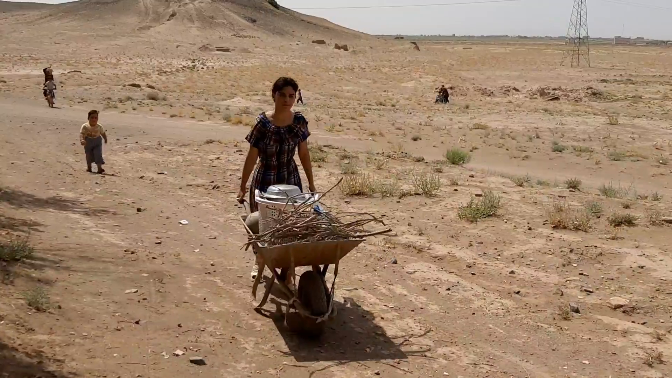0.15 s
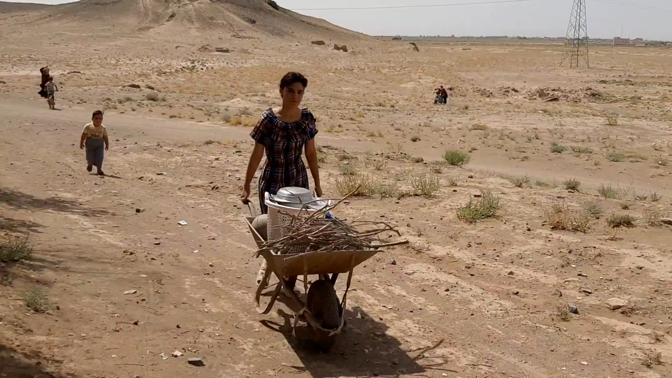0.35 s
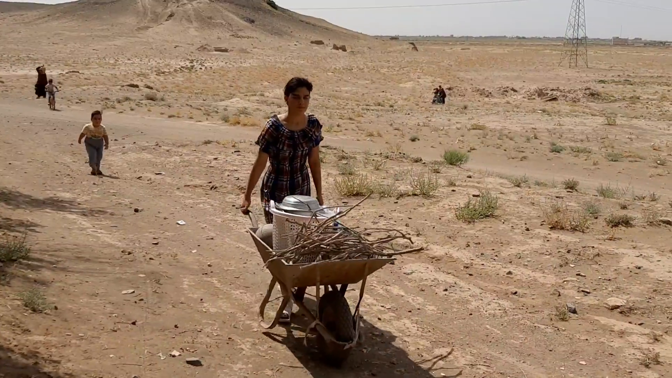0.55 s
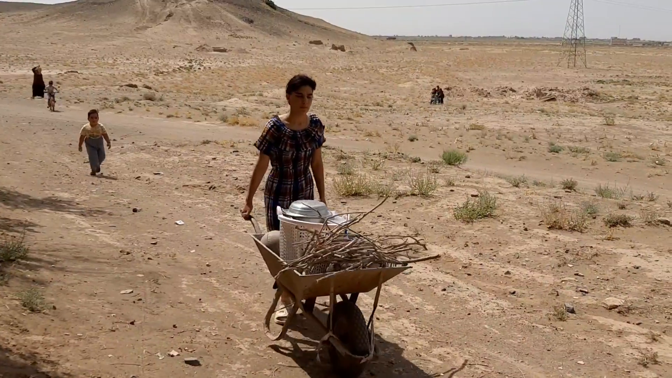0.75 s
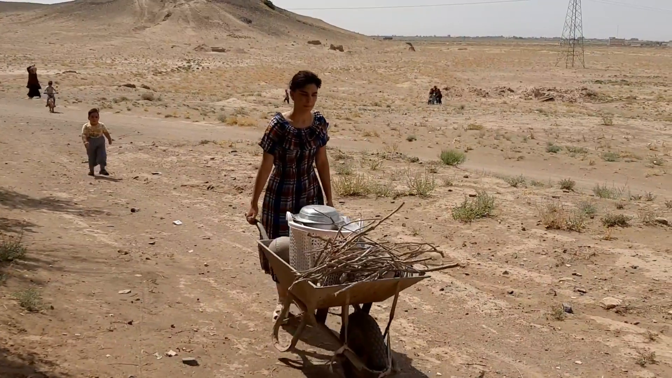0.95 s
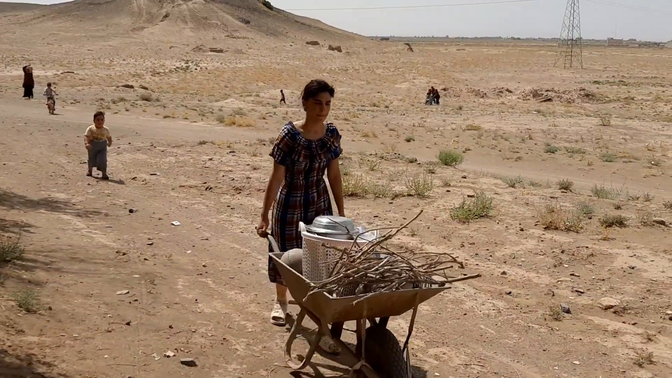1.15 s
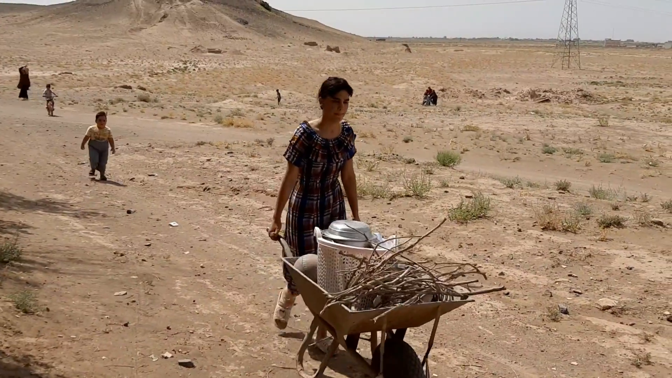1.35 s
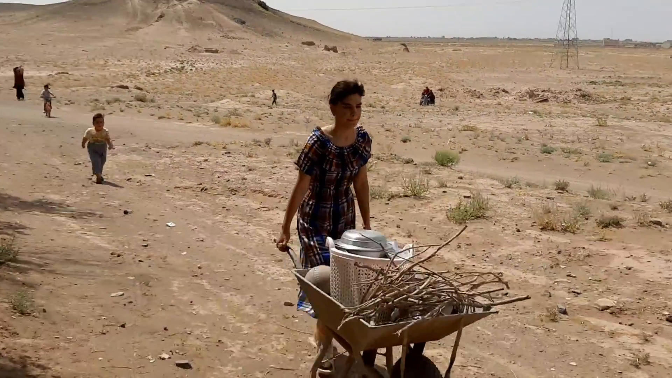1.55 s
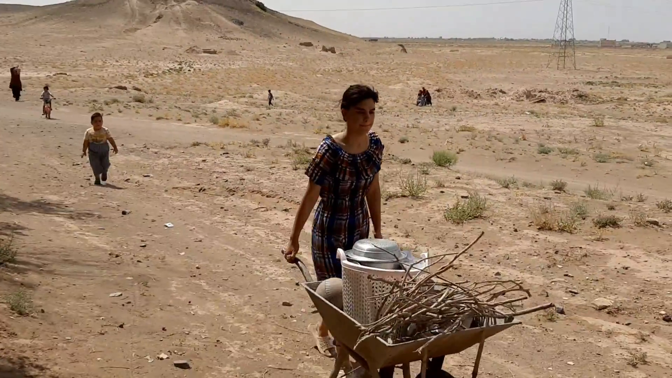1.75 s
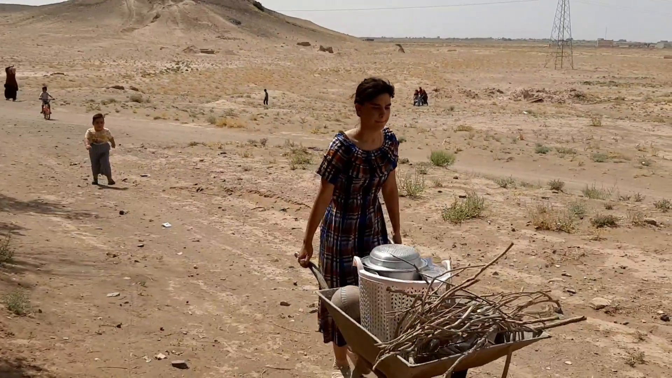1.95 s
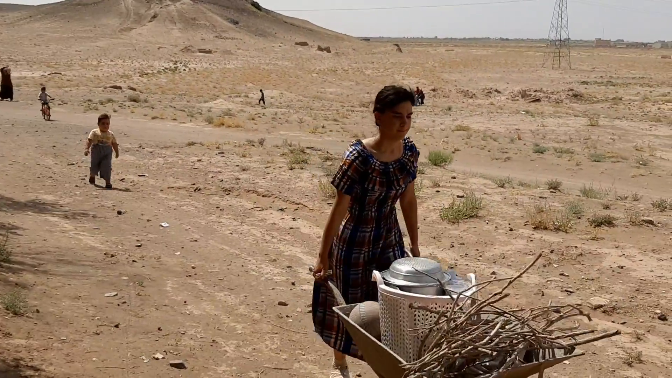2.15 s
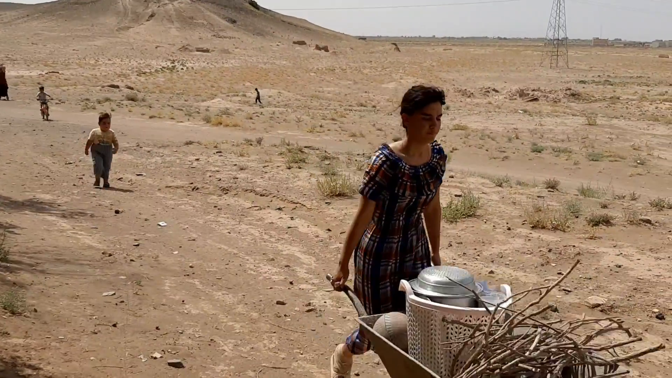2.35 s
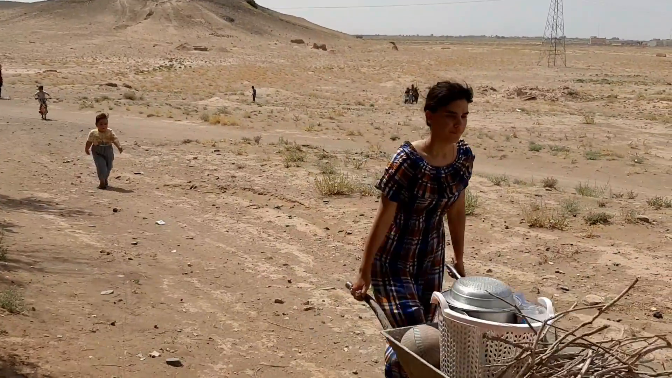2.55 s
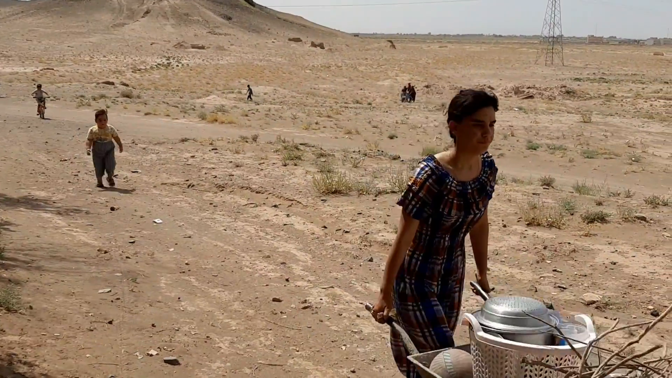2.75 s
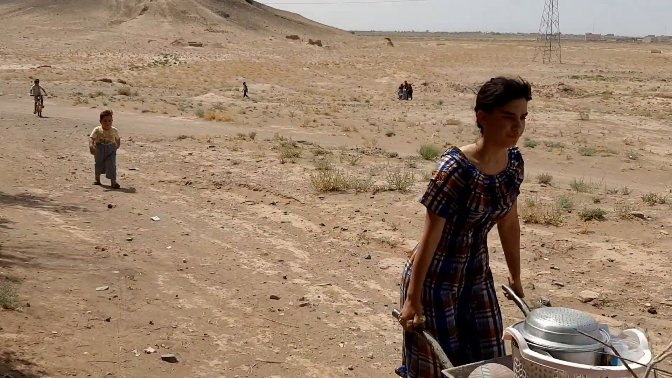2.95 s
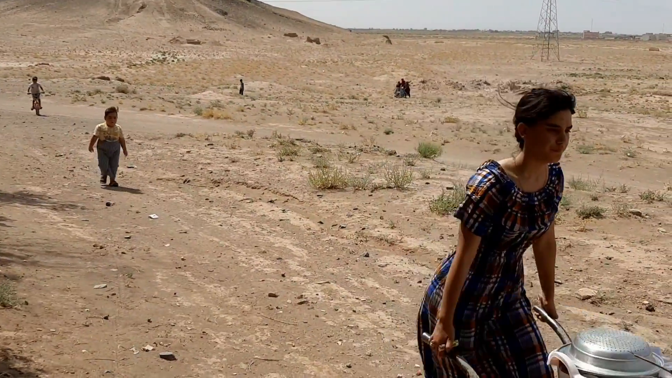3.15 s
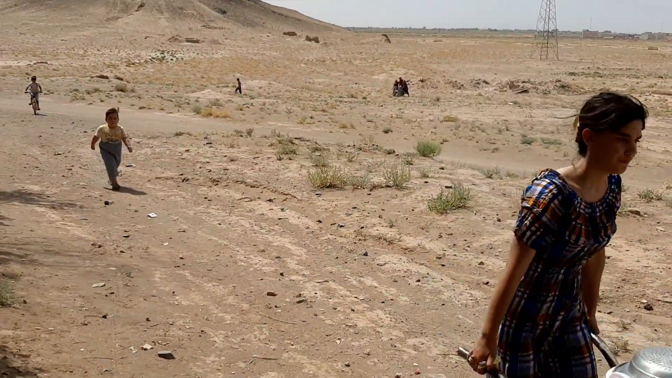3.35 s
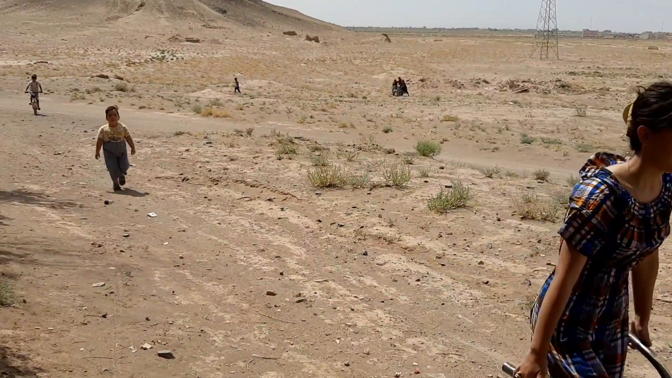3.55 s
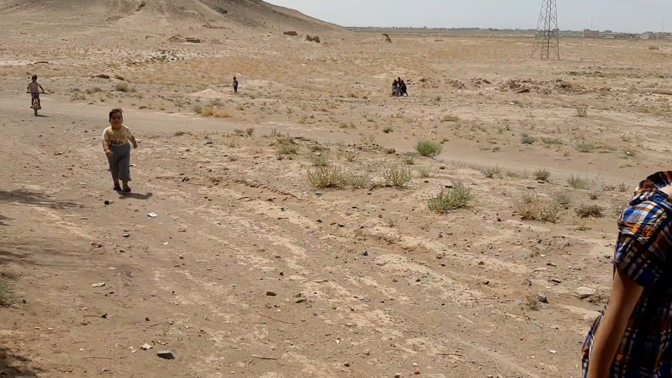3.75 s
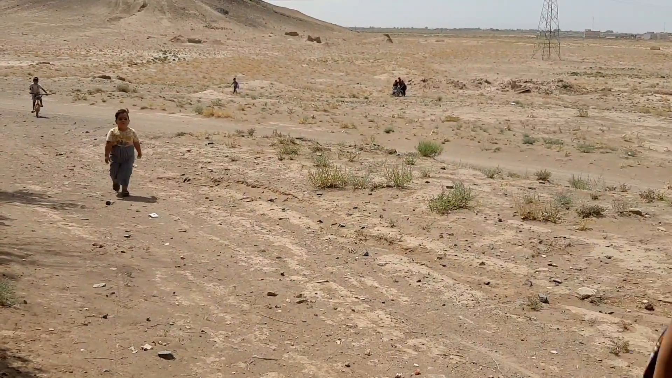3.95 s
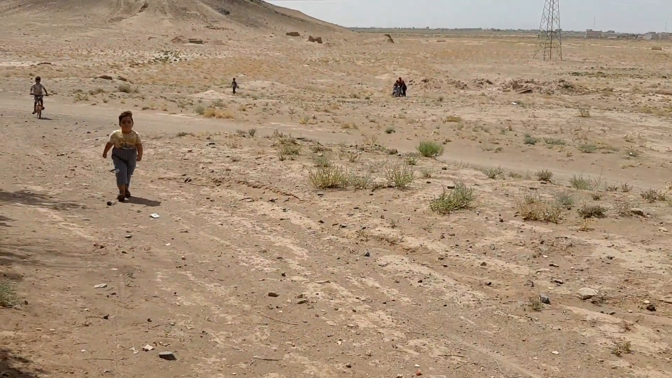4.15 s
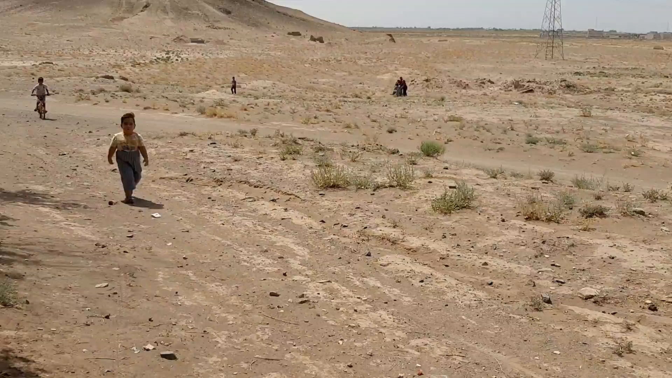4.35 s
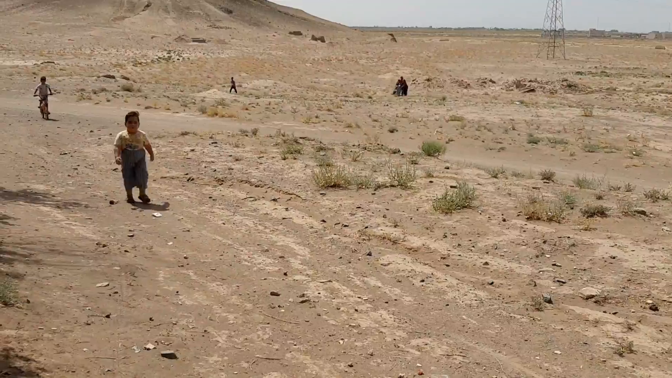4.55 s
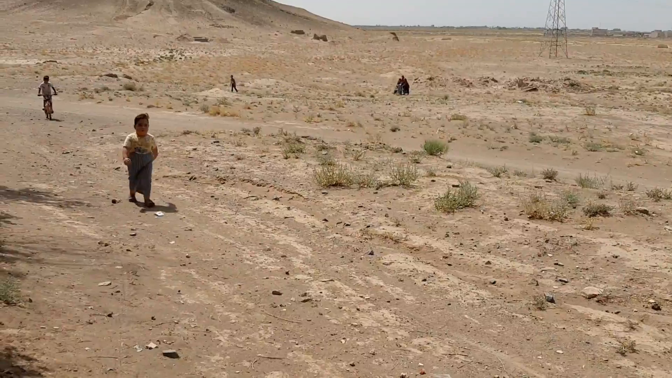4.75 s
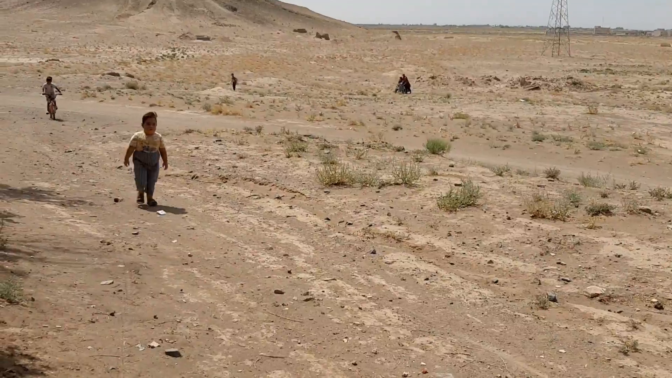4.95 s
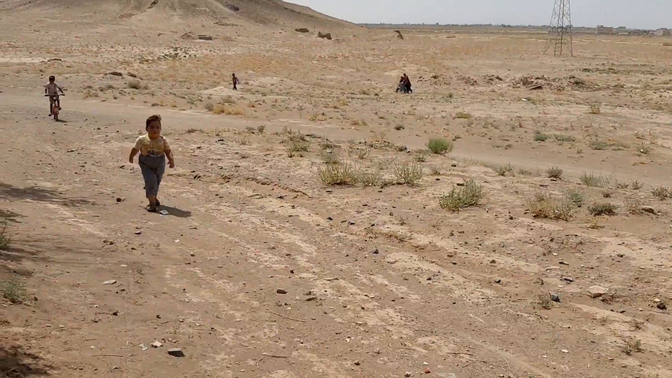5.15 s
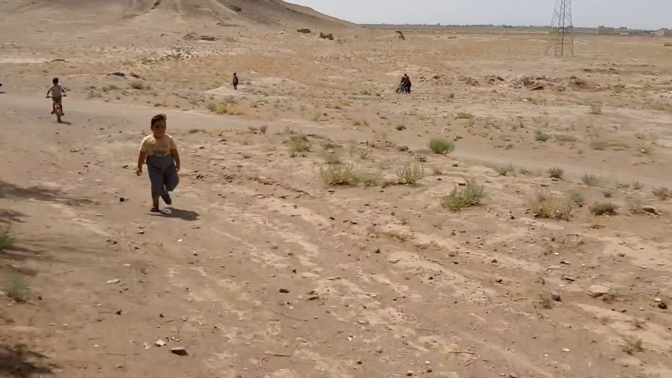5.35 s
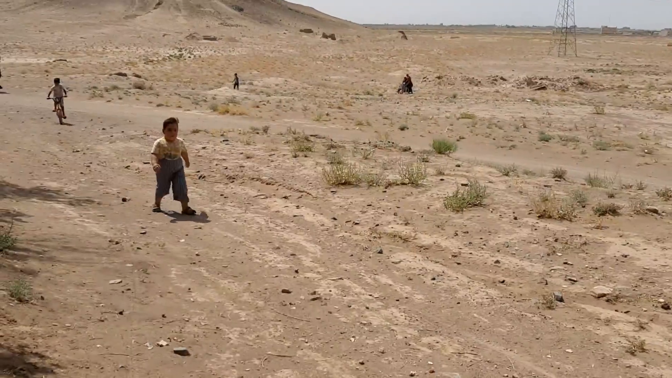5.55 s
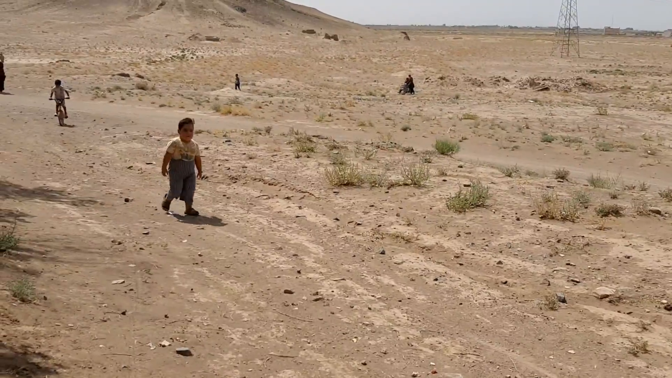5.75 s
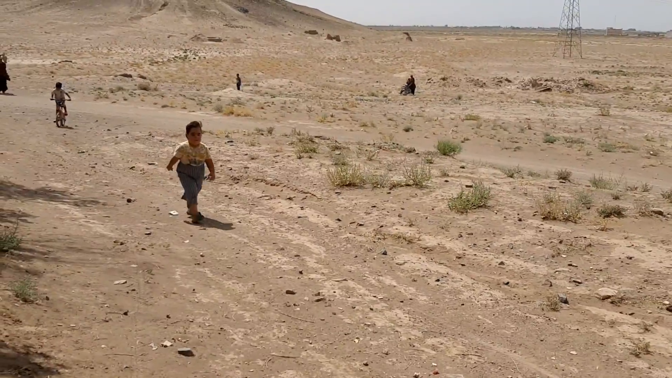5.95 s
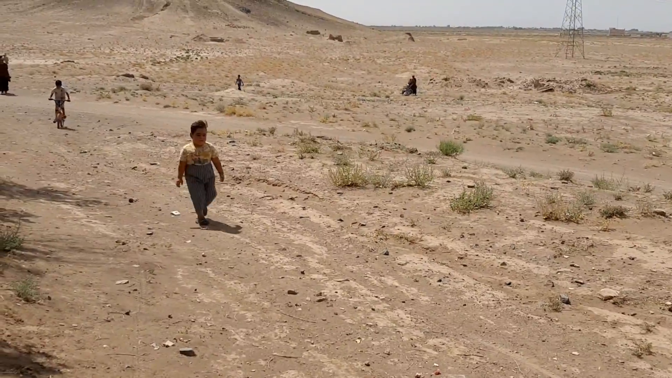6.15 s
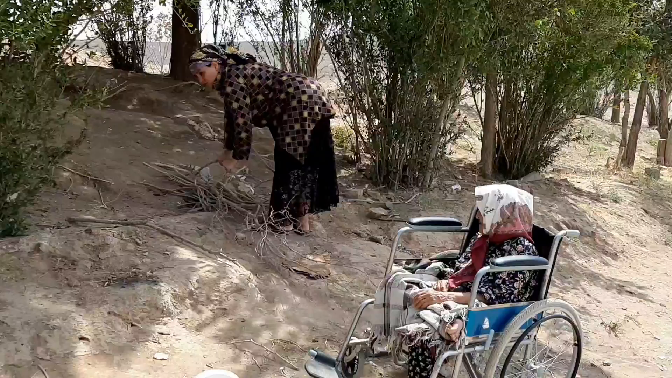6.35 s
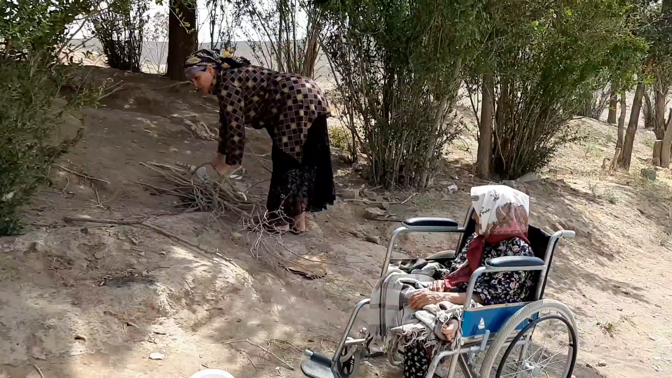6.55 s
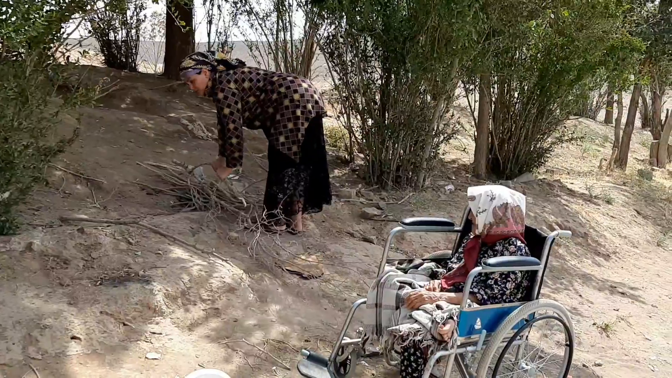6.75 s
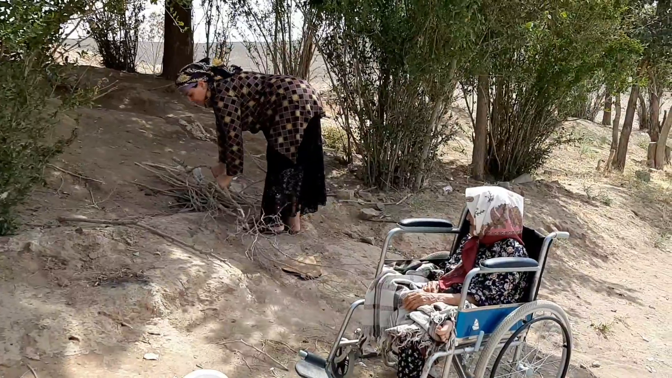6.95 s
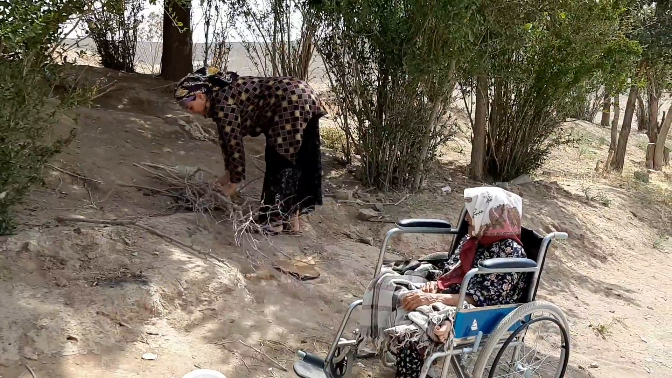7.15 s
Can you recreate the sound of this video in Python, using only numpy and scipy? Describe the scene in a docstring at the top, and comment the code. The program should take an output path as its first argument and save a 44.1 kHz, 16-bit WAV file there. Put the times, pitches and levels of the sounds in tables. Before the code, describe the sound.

Faint gritty crunching grows into metallic clatter and hollow tray booms, peaks in a hard jolt, then cuts to gusty wind and a dry wood crack.

```python
"""A steel wheelbarrow of pots and sticks is pushed over dry stony ground, close by on the microphone's right.
Blows make its load chatter, boom in the tray and ring the steel; on hard ground the tyre's lugs strike
about twelve times a second. Filtered grains make grit, scuffs and drone; decaying sines make pots clink.
Noise in gusts buffets the two microphone ports. Then the scene changes to a windy grove:
dry twigs snapped for firewood crack as splintering grains and rustle, and a branch rings."""
import sys
import numpy as np
from scipy import signal
from scipy.fft import rfft, irfft, next_fast_len
from scipy.io import wavfile
from scipy.ndimage import map_coordinates

SR = 44100
rng = np.random.default_rng(int(sys.argv[2]) if len(sys.argv) > 2 else 0)


def unload_wav(signal):
    """Save mono or channel-first audio to the path in sys.argv[1] as 16-bit WAV at rate SR, clipped to [-1, 1]."""
    wavfile.write(
        sys.argv[1],
        SR,
        np.round(np.clip(np.atleast_2d(signal).T, -1, 1) * 32767).astype(np.int16),
    )


N = 317564

CHANGE_S = 6.371  # the plain gives way to the grove
TOP_HZ = 15900  # upper band limit of the microphone


def amp(db):
    """Amplitude factor of a level in dB."""
    return 10 ** (np.asarray(db) / 20)


def unit(x):
    """x scaled to rms 1."""
    return x / np.sqrt(np.mean(x ** 2) + 1e-20)


def colour(points):
    """Gain against frequency from (f/Hz, level/dB) points on a log axis."""
    f, db = np.transpose(points)
    return lambda hz: amp(np.interp(np.log(hz + 1), np.log(f), db))


def resonances(modes):
    """Causal response of a few (f/Hz, width/Hz, level/dB) resonances."""
    return lambda f: sum(amp(db) * 1j * f * w / (c * c - f * f + 1j * f * w) for c, w, db in modes)


def curves(rows):
    """One value per sample for each column after the time."""
    s, *columns = np.transpose(rows)
    return [np.interp(np.arange(N) / SR, s, column) for column in columns]


def wobble(rate):
    """A smooth random curve, rate knots a second."""
    knots = rng.standard_normal(int(N * rate / SR) + 4)
    return map_coordinates(knots, [np.arange(N) * rate / SR])


def filtered(x, response):
    """x times a response of frequency."""
    n = x.shape[-1]
    m = next_fast_len(n + 4096)
    return irfft(rfft(x, m) * response(np.fft.rfftfreq(m, 1 / SR)), m)[..., :n]


def causal(points, size=2048):
    """Minimum-phase impulse response with the given spectrum, by folding the cepstrum."""
    cepstrum = irfft(np.log(colour(points)(np.fft.rfftfreq(size, 1 / SR))))
    cepstrum[1:size // 2] *= 2
    cepstrum[size // 2 + 1:] = 0
    return irfft(np.exp(rfft(cepstrum)))


def unequal_sizes(n, spread_db):
    """Random strengths, with a clipped normal spread in dB."""
    return amp(spread_db * np.clip(rng.standard_normal(n), -2, 2))


def grains(n, rate, spread_db, unlike=1.0):
    """Random tiny impacts of unequal size, rms 1; each one radiates differently to the two ports."""
    sizes = unequal_sizes(n, spread_db) * rng.choice([-1, 1], n)
    struck = rng.random(n) < rate / SR
    ports = 1 + unlike * rng.standard_normal((2, n))
    return unit(sizes * struck * ports)


def pebbles(hz, spread_db, count, size):
    """Stereo patter of rms 1: tiny stones that each ring for a few cycles at their own pitch."""
    t = np.arange(size) / SR
    pitch = np.minimum(hz * np.exp(.28 * rng.standard_normal((count, 1))), TOP_HZ)
    ticks = np.sin(2 * np.pi * pitch * t) * np.exp(-pitch * t / 2.5)
    ports = 1 + rng.standard_normal((2, count))
    sizes = unequal_sizes(count, spread_db) * ports * rng.choice([-1, 1], count)
    where = (rng.integers(0, N, (count, 1)) + np.arange(size)).ravel()
    return unit(np.array([np.bincount(where, (ticks * port[:, None]).ravel(), N + size)[:N]
                          for port in sizes]))


def swells(rows):
    """Gain curve of brief pushes that rise exponentially to a peak and fall away."""
    t = np.arange(N) / SR
    return sum(amp(db) * np.exp(-np.maximum((s - t) / rise, (t - s) / fall))
               for s, db, rise, fall in rows)


def add(track, s, sound):
    """Lay a sound into a track at a time in seconds."""
    part = track[..., max(round(s * SR), 0):][..., :sound.shape[-1]]
    part += sound[..., :part.shape[-1]]


def ringing(strikes, modes):
    """Every strike rings the modes as decaying sines, at new strengths and slightly detuned."""
    out, t = np.zeros(N), np.arange(SR // 3) / SR
    onset = 1 - np.exp(-t / 0.00027)
    for s, db in strikes:
        ring = np.zeros(len(t))
        for hz, level, t60 in modes:
            decay = amp(level + rng.normal(0, 2.5) - 60 * t / t60)
            ring += decay * np.sin(2 * np.pi * (hz * rng.normal(1, 0.0032) * t + rng.random()))
        add(out, s, amp(db) * ring * onset)
    return out


def turbulence(spectrum, lumps_db, lumps_rate, shared):
    """Lumpy stereo noise of rms 1, only partly alike at the two ports."""
    noise = rng.standard_normal((2, N)) + shared * rng.standard_normal(N)
    lumps = amp(lumps_db * np.array([wobble(lumps_rate), wobble(lumps_rate)]))
    return unit(filtered(noise * lumps, colour(spectrum)))


# gusts on the microphone: start of the hold t/s, length of the hold/s, level/dB
GUSTS = [(0, 0.0042, -40), (0.272, 0.095, -46.5), (0.474, 0.18, -41), (0.769, 0.26, -40.5),
         (0.965, 0.09, -52), (1.08, 0.049, -53.5), (2.427, 0.043, -57), (3.31, 0.069, -61),
         (3.436, 0.056, -58), (3.64, 0.071, -44), (3.833, 0.15, -50), (3.983, 0.45, -54),
         (4.67, 1.7, -66.5), (6.398, 0.13, -36.5), (6.614, 0.071, -32.5), (6.85, 0.023, -32),
         (7.084, 0.12, -38)]
GUST_RISE_S, GUST_FALL_S = 0.011, 0.035  # time constants


def wind_strength(breeze_db):
    """Gain curve of a steady breeze and of gusts that rise, hold and fall away."""
    t = np.arange(N) / SR
    gusts = []
    for s, length, db in GUSTS:
        before, after = np.maximum(s - t, 0), np.maximum(t - s - length, 0)
        gusts.append(amp(db) * np.exp(-before / GUST_RISE_S - after / GUST_FALL_S))
    return np.maximum(np.max(gusts, axis=0), amp(breeze_db))


# spectrum of the quiet air on the plain: f/Hz, level/dB
PLAIN_AIR = [(30, -30), (300, -23), (900, -1.5), (2500, -1), (7000, -1.5), (12000, -14.5), (16000, -6.5)]
# spectrum of wind buffeting the microphone, here and in the grove: f/Hz, level/dB
BUFFET = [(20, -18), (60, 5), (150, 0.5), (250, -5), (450, -18), (900, -40), (2000, -88)]
PLAIN_BREEZE_DB = -78  # buffeting between the gusts


def plain():
    """Open, quiet air is faint noise; light gusts swell a low buffeting noise on the microphone."""
    air = amp(-61) * turbulence(PLAIN_AIR, lumps_db=.5, lumps_rate=8, shared=.6)
    buffet = turbulence(BUFFET, lumps_db=2.5, lumps_rate=25, shared=0.54)
    return air + wind_strength(PLAIN_BREEZE_DB) * buffet


# spectrum of wind fluttering on the ports: f/Hz, level/dB
FLUTTER = [(120, 2), (350, 4), (650, -5), (1100, -28), (1500, -33), (2200, -39), (5000, -58), (10000, -90)]
# spectrum of the faint hiss in the grove: f/Hz, level/dB
GROVE_AIR = [(100, 7), (1000, -12), (2500, -7), (7000, -7), (11000, -17), (16000, -13)]
GROVE_BREEZE_DB = -40.5  # buffeting between the gusts
FLUTTER_DB, FLUTTER_GROWS = -41, 0.56  # flutter in the breeze; dB gained per dB of gust


def grove():
    """Stronger wind thumps and flutters on the ports over a faint hiss."""
    strength = wind_strength(GROVE_BREEZE_DB)
    buffet = strength * turbulence(BUFFET, lumps_db=2.5, lumps_rate=42, shared=0.15)
    growth = (strength / amp(GROVE_BREEZE_DB)) ** FLUTTER_GROWS
    flutter = amp(FLUTTER_DB) * growth * turbulence(FLUTTER, lumps_db=7.5, lumps_rate=120, shared=0.21)
    hiss = amp(-71) * turbulence(GROVE_AIR, lumps_db=1.5, lumps_rate=20, shared=.5)
    return buffet + flutter + hiss


# spectrum of a single eddy flapping on a port: f/Hz, level/dB
FLAP = [(40, -30), (150, 6.5), (350, 4), (650, -2), (1000, -13.5), (1500, -24.5), (2200, -34.5),
        (5000, -58.5), (10000, -92)]
# eddies slap the microphone: peak t/s, level/dB, rise/s, fall/s, brightness 0-1
SLAPS = [(0.135, -48.5, 0.0028, 0.053, 0), (0.499, -33.5, 0.01, 0.0035, 0.34),
         (0.548, -31.5, 0.007, 0.025, 0.04), (0.615, -30, 0.0057, 0.006, 0.28),
         (0.902, -29, 0.015, 0.0046, 0.38), (3.827, -33, .008, 0.042, 0.95),
         (3.885, -32.5, 0.013, 0.037, 0.72), (6.437, -28.5, 0.0051, 0.015, 0.25),
         (6.494, -29, 0.0022, 0.0026, 0.87), (6.519, -36.5, 0.0038, 0.0054, 0.53),
         (6.585, -30, .003, 0.012, 0.96), (6.618, -30, 0.0062, 0.0058, 0.9),
         (6.659, -27, 0.0096, 0.0062, 0.8), (6.692, -20, 0.0014, 0.01, 1),
         (6.712, -27.5, 0.0033, 0.018, 0.5), (6.747, -28, 0.0037, 0.013, 1),
         (6.878, -26, 0.0093, 0.027, 0.96), (6.962, -45, .01, 0.058, 1),
         (7.021, -30.5, 0.0037, 0.034, 0.77), (7.078, -28, 0.0012, 0.0031, 0.7),
         (7.11, -29, 0.012, 0.0071, 1), (7.167, -25.5, 0.025, 0.015, 0.72)]


def slaps():
    """Single eddies hit the ports with their full force: dull ones thump, bright ones flap."""
    thump = turbulence(BUFFET, lumps_db=1.5, lumps_rate=70, shared=0.55)
    flap = turbulence(FLAP, lumps_db=3, lumps_rate=200, shared=0.7)
    out = np.zeros((2, N))
    for *eddy, bright in SLAPS:
        push = swells([eddy])
        slap = push * (thump + np.clip(bright, 0, 1) * (flap - thump))
        out += unit(slap) * np.sqrt(np.mean(push ** 2))
    return out


# large eddies give the microphone one low push: centre t/s, envelope peak level/dB, f/Hz
THUMPS = [(.81, -29, 70), (.897, -30, 300), (6.392, -32, 80), (6.43, -29, 65), (6.463, -30, 100),
          (6.52, -26, 130), (6.61, -31, 115), (6.626, -29, 110), (6.655, -22.5, 150), (6.693, -22, 520),
          (6.712, -25, 230), (6.879, -22, 160), (7.112, -23, 190), (7.146, -29, 80), (7.176, -23, 70)]


def thumps():
    """A large eddy pushes and pulls once, out of step at the two ports."""
    out, t = np.zeros((2, N)), np.arange(-SR // 25, SR // 25) / SR
    for s, db, hz in THUMPS:
        turn = rng.random() + .22 * rng.standard_normal((2, 1))  # phase at each port, in cycles
        bell = np.exp(-(hz * t / .6) ** 2)
        add(out, s + t[0], amp(db) * bell * np.cos(2 * np.pi * (hz * t + turn)))
    return out


# dry twigs rustle in the grove: peak t/s, level/dB, rise/s, fall/s
RUSTLES = [(6.872, -48.5, 0.0016, 0.02), (7.123, -32, 0.0022, 0.028)]
# spectrum of the twigs: f/Hz, level/dB
TWIGS = [(500, -25), (1200, 5), (3000, -6), (5000, 2), (8000, -2.5), (12000, -5), (16000, -2.5)]


def rustling():
    """A bundle of twigs crackles and settles as it is pulled and broken, in swells of grains."""
    return swells(RUSTLES) * unit(filtered(grains(N, rate=9000, spread_db=3), colour(TWIGS)))


# a dry branch is knocked or broken: t/s, level/dB
KNOCKS = [(6.518, -47), (7.12, -24.5)]
# modes of the branch: f/Hz, level/dB, t60/s
BRANCH = [(2040, -9.5, 0.04), (2570, -1, 0.012), (2680, 5, 0.013), (4020, -19, 0.04), (4800, -18, 0.04)]


def knocks():
    """A dry branch rings very briefly in its own modes."""
    return ringing(KNOCKS, BRANCH)


# a stone is pinched, the load clacks or a twig snaps:
# t/s, peak level/dB before placing, bright edge against body level/dB, t60/s, f/Hz
SNAPS = [(.031, -34, -18, .02, 2000), (.084, -36, 0, .015, 5000), (.209, -34, -28, .03, 1200),
         (.451, -36, -8, .02, 4500), (.514, -35, -16, .035, 4200), (1.358, -29, -25, .025, 1100),
         (1.611, -32.5, -22, .025, 1300), (1.637, -39, -35, .03, 1050), (2.169, -44, 5, .01, 7000),
         (2.324, -38, -6, .02, 7000), (2.361, -35, 5, .025, 11000), (2.683, -30, -20, .035, 1500),
         (2.83, -29, -20, .025, 5600), (2.878, -27, -30, .03, 1400), (3.011, -30, -10, .025, 6200),
         (3.249, -30, -4, .015, 5500), (3.343, -35, -10, .012, 5000), (3.411, -36, 6, .008, 13000),
         (3.473, -28, 2, .02, 6500), (3.511, -34, 3, .025, 12000), (3.527, -31, -10, .02, 4500),
         (3.61, -33, 0, .01, 4500), (3.675, -37, 8, .008, 14000), (3.709, -32, -18, .025, 4500),
         (3.801, -13.5, -20, .03, 2800), (3.839, -27, 2, .01, 1300), (3.872, -24, -5, .02, 4400),
         (3.895, -15, -3, .035, 4600), (3.94, -23, -8, .02, 4200), (3.952, -24, -10, .02, 4400),
         (3.967, -14, -8, .03, 4000), (4.035, -19, -5, .02, 4400), (4.06, -22, -18, .025, 4000),
         (4.797, -38, 0, .015, 6000), (4.817, -31, -25, .045, 1200), (4.886, -31, 0, .016, 6000),
         (6.251, -26, 8, .012, 6000), (6.309, -27, -30, .035, 1700), (6.981, -41, 6, .02, 6500),
         (7.119, -12, -3, .035, 2700)]
FIRST_CRACK_DB = 19  # the first break, over the splinters that follow it
SNAP_RING_DB = 11  # each thing's own pitch, over its broad crack


def snaps():
    """Small hard things knock or give way: one sharp break and its splinters, pitched, with a bright edge."""
    out, t = np.zeros((2, N)), np.arange(SR // 10) / SR
    wood = causal([(400, -10.0), (1000, 23.0), (2300, 16.0), (5000, 15.5), (8000, 12.0), (16000, 0)])
    edge = causal([(3000, -18), (7000, 40), (12000, 45), (16000, 42)])
    for s, db, edge_db, t60, hz in SNAPS:
        body = wood / np.linalg.norm(wood) + amp(edge_db) * edge / np.linalg.norm(edge)
        breaks = grains(len(t), rate=10000, spread_db=2) * amp(-60 * t / t60)
        breaks[:, 0] = amp(FIRST_CRACK_DB)
        broad = signal.fftconvolve(breaks, [body], axes=1)[:, :len(t)]
        ring = resonances([(hz, hz / 8, SNAP_RING_DB)])
        crack = filtered(broad, lambda f: 1 + ring(f))
        add(out, s, amp(db) * crack / np.abs(crack).max())
    return out


# soles and tyre scrape the dirt: peak t/s, level/dB, rise/s, fall/s
SCUFFS = [(.077, -42.5, 0.0042, 0.0067), (.59, -46.5, 0.019, 0.019), (.705, -46, 0.015, 0.011),
          (1.669, -37, 0.0066, 0.0064), (1.686, -34.5, 0.0033, 0.0076), (2.4, -42.5, 0.032, 0.007),
          (3.52, -41.5, .015, 0.064), (4.824, -43.5, 0.017, 0.0058), (5.826, -42.5, 0.0061, 0.013),
          (6.294, -49, 0.02, 0.025)]
# spectrum of the scrape: f/Hz, level/dB
SCUFF = [(180, -72), (300, -33), (584, -28), (930, -10.5), (2210, -18.5), (2610, -12.5), (3030, -25.5),
         (5250, -15), (8360, -32), (9390, -27), (16000, -35)]


def scuffs():
    """A sliding sole or tyre drags a swell of dense grains."""
    return swells(SCUFFS) * unit(filtered(grains(N, rate=14000, spread_db=2.5), colour(SCUFF)))


# pebbles grind together under the tyre: peak t/s, level/dB, rise/s, fall/s
GRINDS = [(.06, -54, .04, 0.075), (.44, -54, .03, .04), (.59, -45, 0.0087, 0.037), (.675, -47, .007, .014),
          (.707, -47, 0.011, 0.019), (1.2, -55, 0.015, 0.024), (1.792, -50, .002, .008),
          (2.19, -49.5, 0.011, .02), (2.32, -49, 0.007, 0.011), (2.4, -45, 0.014, 0.0071),
          (2.702, -34.5, 0.0045, 0.0066), (2.874, -42, .006, 0.0041), (2.94, -49.5, 0.0027, 0.027),
          (3.04, -46.5, .012, 0.013), (3.365, -44, .012, 0.01), (3.824, -33, .008, .016),
          (5.82, -44.5, 0.011, 0.019)]


def grinding():
    """The tyre presses a patch of pebbles together in a short, low crunch."""
    return swells(GRINDS) * pebbles(1350, spread_db=3, count=7000, size=256)


# grit and dust under the tyre: t/s, crunch level/dB, dust level/dB
GRIT = [(0, -51.5, -61), (.35, -58.5, -74), (.8, -56.5, -67), (1.28, -62, -68.5), (1.53, -58.5, -64),
        (2.02, -63.5, -75.5), (2.36, -47.5, -53), (2.62, -58, -68.5), (3.25, -54.5, -69),
        (3.5, -52.5, -51.5), (3.62, -54, -60), (3.76, -43.5, -55.5), (3.96, -38.5, -48), (4.1, -60.5, -73),
        (4.7, -57, -80), (5.05, -64, -74), (5.7, -63.5, -79), (5.95, -57, -75.5), (6.36, -84, -74.5)]
# spectrum of crushed grit: f/Hz, level/dB
CRUNCH = [(290, -18), (500, -7), (644, -22), (679, 0), (1010, 0.5), (3580, -7.5), (4920, -6.5),
          (6770, -6.5), (8610, -47), (12000, -15), (15600, -62), (22000, -120)]
# spectrum of dust: f/Hz, level/dB
DUST = [(4000, -30), (7000, 0), (11000, 0), (16000, -3)]


def crushing():
    """The tyre crushes grit in a dense run of grains and dust in tiny high ticks."""
    crunch_db, dust_db = curves(GRIT)
    grit = grains(N, rate=5500, spread_db=3.5)
    sand = pebbles(10500, spread_db=4.5, count=14000, size=48)
    crunch = unit(filtered(grit, colour(CRUNCH))) * amp(crunch_db + 2.7 * wobble(60))
    dust = unit(filtered(sand, colour(DUST))) * amp(dust_db + 0.76 * wobble(95))
    return crunch + dust


# the tray drones as the barrow rolls: t/s, level/dB
DRONE = [(0, -97), (1.0, -73.5), (2.1, -76.5), (2.6, -72), (2.85, -56.5), (3.72, -51.5), (3.9, -36),
         (4.08, -49.5), (4.45, -56), (5.0, -55), (5.4, -49), (5.8, -54.5), (6.05, -59.5), (6.36, -57)]
# resonances of the hollow of the tray: f/Hz, width/Hz, level/dB
TRAY_HOLLOW = [(381, 75, 9.5), (474, 124, 4.5), (633, 180, -39), (790, 55, -40)]


def droning():
    """Rolling keeps the hollow of the tray sounding: dense impacts through its resonances."""
    drone = unit(filtered(grains(N, rate=3000, spread_db=5), resonances(TRAY_HOLLOW)))
    return drone * amp(curves(DRONE)[0] + 2.5 * wobble(30))


# a pot lid clinks: t/s, level/dB, to which each mode adds its own
CLINKS = [(.797, -84.5), (1.86, -90.5), (3.592, -75), (4.116, -86)]
# modes of the lid: f/Hz, level/dB, t60/s
LID = [(3370, 31.5, 0.13), (3930, 18, 0.12), (4540, 26, 0.13), (6560, 36.5, 0.065), (9600, 19, 0.1)]


def clinks():
    """A pot lid is struck and rings in its own modes."""
    return ringing(CLINKS, LID)


# hard jolts of the steel frame: t/s, level/dB
JOLTS = [(3.896, -45), (3.938, -28.5), (3.967, -29), (4.036, -42)]
# modes of the frame: f/Hz, level/dB, t60/s
FRAME = [(700, 3, .14), (2042, -11, .09), (2690, -4, .12), (2875, -9, .1), (3133, -8, .15), (3708, -9, .09),
         (4496, -9, .08), (7799, -4, .13), (7912, -6, .08), (12302, -16, .09)]


def jolts():
    """Hard jolts ring the steel frame in its modes."""
    return ringing(JOLTS, FRAME)


# the heaviest drops of the load: t/s, level/dB
DROPS = [(3.803, -25), (3.9, -27.5)]
# modes of the whole tray: f/Hz, level/dB, t60/s
TRAY_RING = [(461, 0, .3), (706, -13, .2), (797, -16, .3), (1282, -17, .35), (1385, -19, .3),
             (2690, -17, .12), (2864, -15, .14)]


def drops():
    """The heaviest drops leave the whole tray ringing in its long modes."""
    return ringing(DROPS, TRAY_RING)


# the barrow is jolted by a tyre lug or a stone, or its load drops back on the tray:
# t/s, clatter level/dB, boom level/dB, treble level/dB, boom f/Hz
BUMPS = [(0.01, -49, -71, -8, 420), (0.207, -54, -69, -35, 420), (0.354, -49, -77, 3, 420),
         (0.933, -41.5, -66, -11, 420), (1.019, -43.5, -49.5, -6, 416), (1.977, -51.5, -62, 2, 435),
         (2.012, -52.5, -69, 1, 432), (2.032, -50, -59.5, -3, 442), (2.174, -47, -62, 1, 436),
         (2.313, -46, -54, -27, 393), (2.38, -41, -49, -21, 465), (2.396, -35.5, -46.5, 7.5, 390),
         (2.461, -40, -53, -0.5, 456), (2.476, -49, -54, 1, 414), (2.496, -46, -58, -11, 450),
         (2.542, -44, -50, -7, 417), (2.559, -41, -52, 3, 396), (2.578, -44, -61, -12, 444),
         (2.612, -41, -51.5, 8, 457), (2.643, -53.5, -54, -2, 450), (2.695, -39, -71, 11, 450),
         (2.708, -42, -58, 0, 453), (2.724, -47.5, -41.5, 10, 398), (2.765, -43, -41.5, 9, 475),
         (2.789, -45, -50, -6, 410), (2.803, -53, -44.5, -3, 383), (2.842, -39.5, -38, 3, 403),
         (2.867, -35, -39, 3.5, 447), (2.875, -53, -59, -28, 435), (2.934, -36.5, -35.5, 11, 450),
         (2.954, -41, -40, -10, 427), (3.018, -42.5, -41.5, 3.5, 437), (3.033, -41.5, -35, 12.5, 397),
         (3.092, -41, -40, 9.5, 463), (3.118, -60, -42.5, -3, 440), (3.183, -45, -37.5, 8, 427),
         (3.201, -37, -38, 4.5, 417), (3.249, -37, -35.5, 7.5, 417), (3.279, -41.5, -34.5, -6, 413),
         (3.346, -40, -37, 8, 410), (3.362, -37, -35.5, 8, 377), (3.428, -36, -34, 9, 465),
         (3.448, -45.5, -44, 4, 380), (3.466, -60, -41.5, -2, 380), (3.517, -47.5, -37, 17, 410),
         (3.54, -38, -34, 8, 435), (3.609, -35, -36.5, 3, 410), (3.631, -42.5, -32.5, 3, 380),
         (3.694, -43, -34, 7, 396), (3.724, -34.5, -33, 9, 420), (3.768, -38, -34.5, 1, 450),
         (3.8, -34.5, -31.5, 6, 368), (3.809, -27, -35, -14, 460), (3.822, -41, -23.5, -15, 444),
         (3.841, -32, -31, -12, 426), (3.858, -39, -34, 1, 407), (3.876, -40, -33, -14, 406),
         (3.894, -31, -32.5, 17, 460), (3.907, -42, -33.5, -20, 454), (3.935, -33, -26.5, 3, 470),
         (3.949, -27, -31.5, 11, 397), (3.967, -28, -28, 0, 350), (4.008, -40.5, -38, -9, 398),
         (4.035, -26.5, -25, 9.5, 407), (4.057, -33, -31, 5.5, 363), (4.116, -49.5, -51, -17, 400),
         (4.157, -35, -36.5, 8, 415), (4.177, -48, -38.5, 7, 364), (4.224, -46, -42.5, 4, 394),
         (4.249, -44, -41.5, 10, 443), (4.296, -44, -42, 7, 430), (4.328, -45, -42.5, 2, 453),
         (4.59, -43, -39, 0, 388), (4.618, -45, -45.5, 12, 427), (4.695, -55, -48.5, -5, 427),
         (4.735, -68, -48, 6, 433), (5.174, -46, -40.5, 2, 420), (5.203, -50, -43, -3, 380),
         (5.225, -55, -42.5, -1, 370), (5.258, -46.5, -42, 4, 404), (5.279, -43.5, -36.5, 4, 372),
         (5.338, -43, -37.5, 4, 423), (5.36, -41.5, -40.5, 12.5, 390), (5.374, -41.5, -35.5, 0, 380),
         (5.412, -39.5, -33, 6, 362), (5.422, -52, -36.5, -2, 385), (5.443, -45.5, -39, -3, 400),
         (5.476, -42.5, -45, 5, 420), (5.498, -42, -34.5, 4, 360), (5.512, -40.5, -42, -2, 360),
         (5.558, -41, -32, 7, 379), (5.586, -43, -38.5, 2.5, 408), (5.64, -47.0, -39.5, 3, 388),
         (5.666, -43, -35.5, 3.5, 373), (5.68, -46, -51, -8, 367), (5.712, -44.5, -37, 6, 375),
         (5.725, -46.5, -45, -13, 402), (5.747, -46, -39, 1, 380), (5.805, -44, -38, 6, 384),
         (5.826, -43, -37, -2, 376), (5.862, -50, -45, -2, 400), (5.881, -48.5, -43, 0, 390),
         (5.899, -54, -47, -4, 410), (5.912, -55, -45, -7, 380), (5.944, -50.5, -45.5, -2, 420),
         (5.963, -57, -49, -7, 420), (5.99, -56, -52, -6, 440)]
# hard ground where the tread drums faintly: first lug t/s, last lug t/s, number of lugs
HARD_GROUND = [(.753, 1.16, 6), (2.21, 2.29, 2), (4.372, 4.522, 3), (4.957, 5.107, 3)]
# strength of that drumming: t/s, clatter level/dB, boom level/dB
TREAD = [(.75, -46.5, -57.5), (1.18, -46.5, -58.5), (2.25, -51.5, -65), (4.37, -50, -58), (4.52, -74, -54),
         (4.96, -54, -55), (5.12, -52, -48.5)]
REBOUND_S, REBOUND_DB = 0.025, -1.5  # mean delay and level of the load dropping back after each lug
TREAD_BOOM_HZ = 440


def blows():
    """All blows on the tray: the listed bumps, and on hard ground a light blow and its rebound per lug."""
    rows = list(BUMPS)
    clatter_db, boom_db = curves(TREAD)
    for first, last, count in HARD_GROUND:
        for s in np.linspace(first, last, count):
            now = round(s * SR)
            rebound = s + REBOUND_S * (1 + .06 * rng.standard_normal())
            for when, db in (s, 0), (rebound, REBOUND_DB):
                rows.append((when, clatter_db[now] + db, boom_db[now] + db, 0, TREAD_BOOM_HZ))
    return rows


DETUNE, MODE_SCATTER_DB = .018, 3  # spread of mode pitch (share) and strength from blow to blow


def shifted(modes):
    """The (f/Hz, width/Hz, level/dB) modes as one blow excites them under the shifting load."""
    scatter = rng.standard_normal((len(modes), 2))
    return [(hz * (1 + DETUNE * a), width, db + MODE_SCATTER_DB * b)
            for (hz, width, db), (a, b) in zip(modes, scatter)]


# first colour of the sheet steel: f/Hz, level/dB
FIRST_STEEL = [(400, -21), (850, 9.5), (1250, -3.5), (2100, -10.5), (3100, -37), (3700, -2.5), (4900, -9),
               (6500, -15.5), (7700, -11.5), (11000, -15.5), (16000, -27)]
# second colour of the sheet steel: f/Hz, level/dB
SECOND_STEEL = [(400, -12.5), (850, -7.5), (1250, -1), (2400, 3), (3100, -13.5), (3700, -7.5),
                (4900, -16.5), (6500, -13.5), (7700, -21), (11000, -20), (16000, -33)]
# ribs and panels that stand out of the clatter: f/Hz, width/Hz, level/dB
PANELS = [(816, 67, 9), (1519, 41, 13.5), (2043, 42, 17.5), (2411, 29, 12), (2670, 160, 6),
          (3666, 145, 17.5), (4440, 210, 8.5), (4925, 127, 14), (5870, 81, 13), (6870, 54, 11.5)]
# the tray's walls clang above its boom: f/Hz, width/Hz, level/dB against the boom
CLANG = [(467, 34, -9.5), (649, 53, -12.5), (708, 42, -9.5), (789, 46, -10.5)]
# how the open tray radiates, little outside its modes: f/Hz, level/dB
RADIATION = [(110, -8.5), (230, -13.5), (330, 2.5), (520, 2.5), (590, -2.5), (670, 3), (850, -5),
             (1200, -23), (3000, -36.5)]
BOOM_WIDTH_HZ = 64
CLATTER_T60_S, BOOM_T60_S = 0.082, 0.067  # main decays
BLOW_S = .014  # a blow's level is its energy spread over this time


def rattle():
    """Each blow sets off a chatter of metal contacts that booms in the tray and clatters in its panels."""
    out, t = np.zeros((2, N)), np.arange(SR // 7) / SR
    second_share = np.clip(curves(PATH)[2], 0, 1)
    first_steel, second_steel = causal(FIRST_STEEL), causal(SECOND_STEEL)
    build_up = 1 - np.exp(-t / .0018)

    def at_level(x, db):
        return amp(db) * x / np.sqrt(np.sum(x ** 2) / (2 * SR * BLOW_S) + 1e-20)

    def dying(t60):
        """Main decay with a weak, longer tail."""
        return build_up * (amp(-60 * t / t60) + amp(-34 - 60 * t / .2))

    for s, clatter_db, boom_db, treble_db, boom_hz in blows():
        share = second_share[round(s * SR)]
        contacts = grains(len(t), rate=1700, spread_db=5.5, unlike=.6) * dying(CLATTER_T60_S)
        steel = (1 - share) * first_steel + share * second_steel
        sheet = signal.fftconvolve(contacts, [steel], axes=1)[:, :len(t)]
        # other pots and sticks of the load touch on every blow and add their own short ring
        load_hz = np.geomspace(900, 7000, 9)[:-1] * 1.29 ** rng.random(8)
        panels = resonances(shifted(PANELS) + [(hz, 55, 11) for hz in load_hz])
        hardness = colour([(1700, 0), (4000, treble_db)])
        clatter = filtered(sheet, lambda hz: (1 + panels(hz)) * hardness(hz))
        pushes = grains(len(t), rate=3000, spread_db=3, unlike=.35) * dying(BOOM_T60_S)
        hollow = resonances([(boom_hz, BOOM_WIDTH_HZ, 0)] + shifted(CLANG))
        boom = filtered(pushes, lambda hz: hollow(hz) * colour(RADIATION)(hz))
        add(out, s, at_level(clatter, clatter_db) + at_level(boom, boom_db))
    return out


# the way past the microphone: t/s, lead of the right port/ms, right minus left level/dB,
# share of the second sheet-steel colour against the first 0-1
PATH = [(0, -0.037, 1.5, 0.58), (1.5, -0.039, 2.5, 0.2), (2.25, 0.044, 2.5, 0.39), (3.1, 0.098, 1.5, 0.21),
        (3.9, .24, 2, 0.66), (4.7, 0.307, 2.5, 0.89), (5.3, 0.38, 2.5, 0.79), (5.8, 0.38, 2.5, 0.8)]


def placed(pair):
    """Delay and level between the ports follow the way past the microphone; no delay in the grove."""
    lead_ms, right_db, _ = curves(PATH)
    now = np.arange(N)
    shift = lead_ms * SR / 2000 * (now < CHANGE_S * SR)  # half the lead, in samples
    return np.array([map_coordinates(x, [now + side * shift], order=5) * amp(side * right_db / 2)
                     for x, side in zip(pair, (-1, 1))])


def scene():
    """The barrow on the plain, then the grove; eddies and snaps are heard in both."""
    t = np.arange(N) / SR
    steel = rattle() + drops() + jolts() + clinks() + droning()
    ground = crushing() + grinding() + scuffs()
    on_plain = (placed(steel + ground) + plain()) * (t < CHANGE_S)
    in_grove = (grove() + knocks() + rustling()) * (t > CHANGE_S + .012)
    return on_plain + in_grove + slaps() + thumps() + placed(snaps())


# treble response of the microphone: f/Hz, level/dB
MICROPHONE = [(7750, -0.5), (8050, -10.5), (8400, -18.5), (9300, -10.5), (10300, -4.5), (11200, 1)]


def record(dry):
    """The microphone has a deep dip in the treble and keeps nothing above its band limit."""
    return filtered(dry, lambda hz: colour(MICROPHONE)(hz) * (hz < TOP_HZ))


dry = scene()
out = record(dry)
unload_wav(out)
```